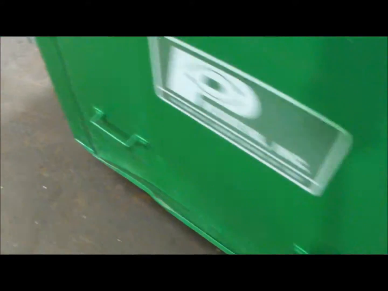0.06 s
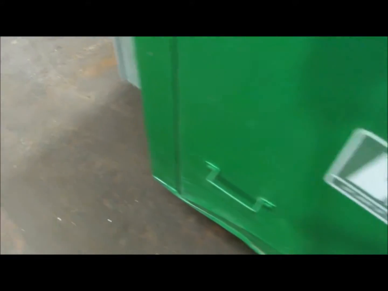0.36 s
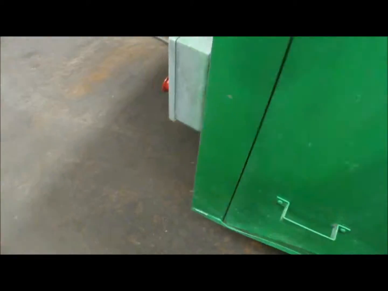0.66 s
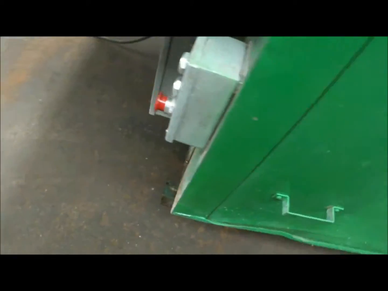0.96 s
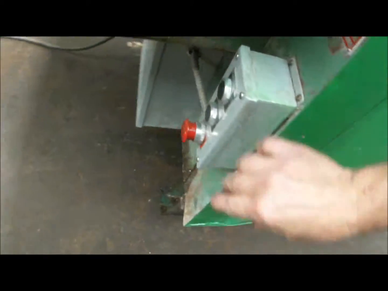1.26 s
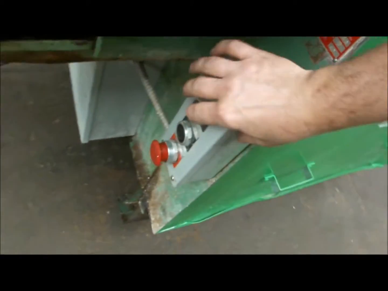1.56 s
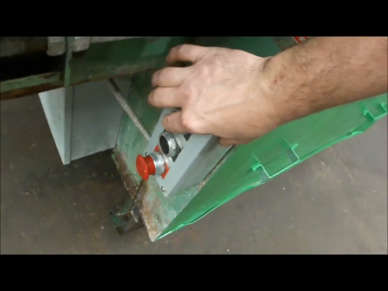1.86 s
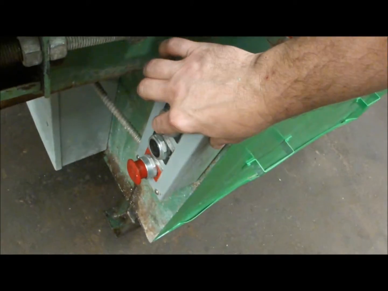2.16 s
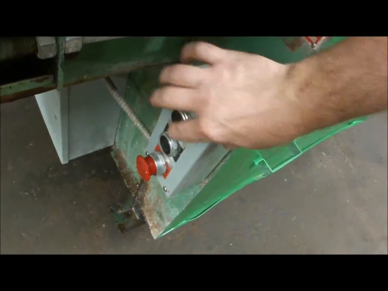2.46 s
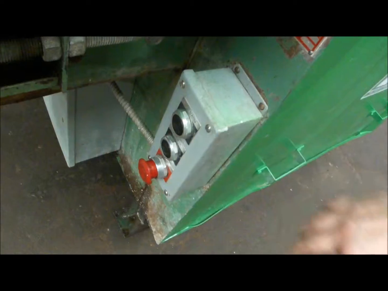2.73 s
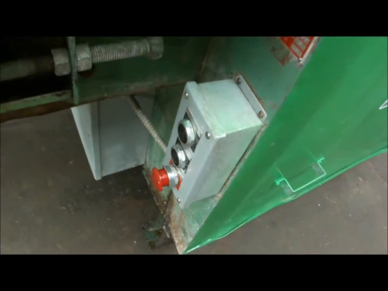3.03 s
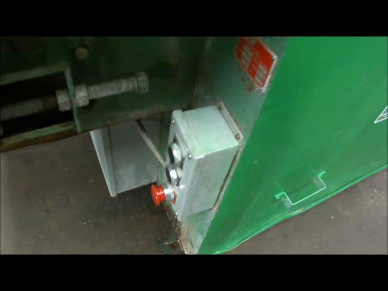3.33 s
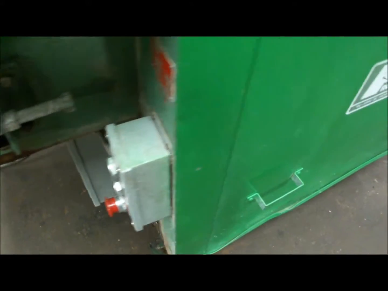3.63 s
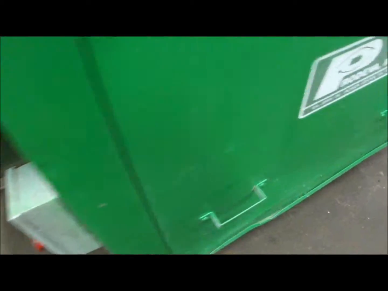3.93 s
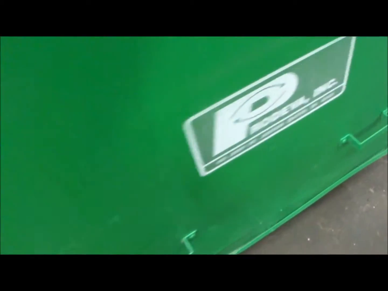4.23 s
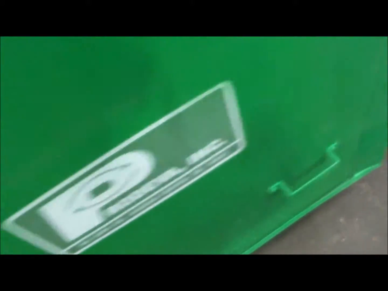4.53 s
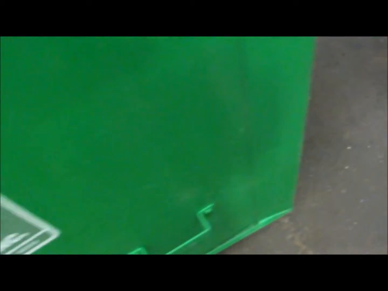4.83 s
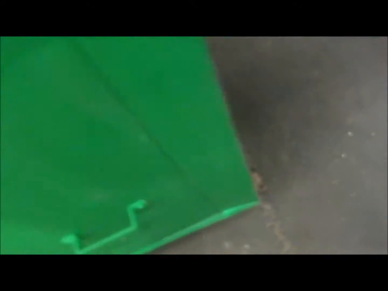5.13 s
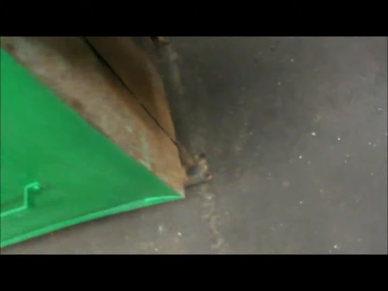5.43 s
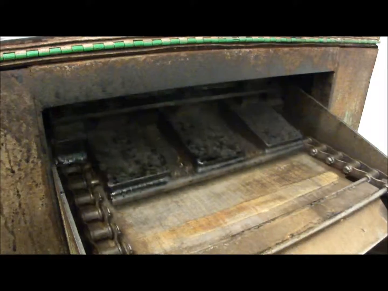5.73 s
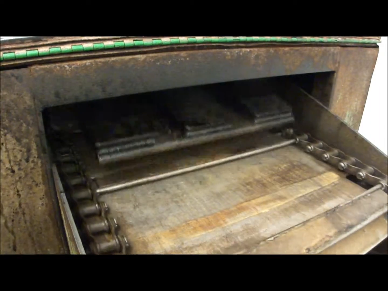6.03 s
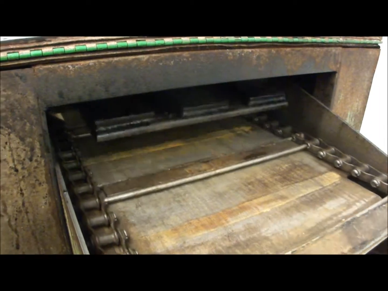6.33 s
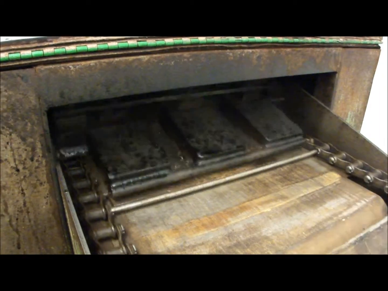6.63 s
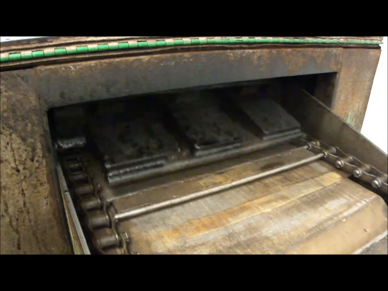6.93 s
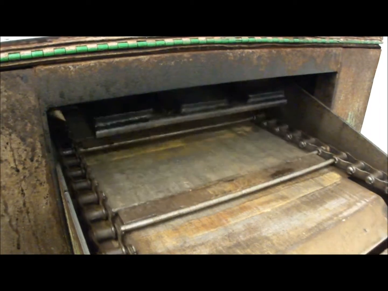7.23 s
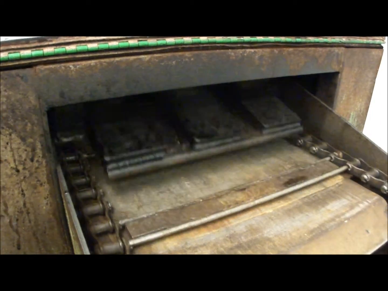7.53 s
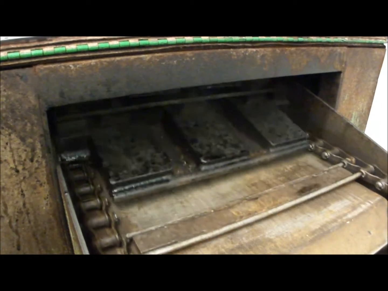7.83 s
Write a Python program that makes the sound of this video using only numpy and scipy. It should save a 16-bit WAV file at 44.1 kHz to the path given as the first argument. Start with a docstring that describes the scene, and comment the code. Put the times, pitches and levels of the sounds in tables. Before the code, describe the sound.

In a workshop, a machine's rumble dies away, leaving soft ventilation and hum. A hand knocks lightly on a control box, then a heavy switch clacks and the crusher starts again. Its steel casing rumbles and groans while a feed chain scrapes and rattles with brief thin squeals. Dull thumps and bright, ringing clanks of a press plate break in, loudest in the second half, all heard from close beside the machine.

```python
"""A machine rumbles to rest, a hand knocks on its control box, and it snaps on again to rattle and clank.
It is a chain-fed crusher in a workshop, heard from beside its steel casing. Once the contactor (a heavy
electric switch) closes, the drive shakes the casing's panels and the feed chain scrapes along a steel bed.
The swinging press plate strikes steel on steel: each clank is a bright crack and a ringing clang.
Throughout, a ring time (t60) is the number of seconds a sound takes to fade by 60 dB."""
import sys
import numpy as np
from scipy import signal
from scipy.fft import rfft, irfft, next_fast_len
from scipy.io import wavfile
from scipy.ndimage import uniform_filter1d

SR = 44100
rng = np.random.default_rng(int(sys.argv[2]) if len(sys.argv) > 2 else 0)


def unload_wav(signal):
    """Save mono or channel-first audio to the path in sys.argv[1] as 16-bit WAV at rate SR, clipped to [-1, 1]."""
    wavfile.write(
        sys.argv[1],
        SR,
        np.round(np.clip(np.atleast_2d(signal).T, -1, 1) * 32767).astype(np.int16),
    )


N = 351918
TIME = np.arange(N) / SR
BLOW_TIME = np.arange(24000) / SR  # the seconds of one blow
START_S = 2.3  # the motor starts
CRACK_RISE_S = .0003  # a crack builds up almost at once

# The tone colour of thin hiss. Each row: frequency in Hz, relative level in dB.
HISS = [(2000, -20), (2900, 6.5), (3500, 0.5), (4500, -3), (5100, -1), (5700, 1.5), (7000, 1), (9500, -6),
        (11000, -16), (12000, -70), (13700, -46), (15000, -16), (16000, -41)]
# The press plate's modes, the notes it rings with. Each row: pitch in Hz, level in dB, ring time in seconds.
PLATE = [(593, 1, 0.45), (777, -6, 0.47), (878, -4.5, 0.68), (940, -6, 0.32), (1040, -23, 0.4),
         (1151, -7, 0.46), (1247, -9.5, 0.35), (1280, -14.5, 0.58), (1708, -16, 0.18), (1800, -20, 0.33),
         (2130, -6.5, 0.31)]
# How near things sound as the listener goes from the control box along the side to the feed opening.
# Each row: time in seconds, casing gain in dB, chain gain in dB.
PLACE = [(2.3, 0, 0), (3., 0, -0.5), (4.5, 2.5, 2), (5.15, -2, 0.), (5.65, -5, 2), (6.6, -6, 1),
         (7.97, -4, 1.6)]


def amp(db):
    """Turns decibels into a gain."""
    return 10 ** (np.asarray(db) / 20)


def unit(x):
    """Scales a signal to an average (rms) level of 1."""
    return x / np.sqrt(np.mean(x ** 2) + 1e-20)


def level_at(spectrum, hz):
    """Looks up a spectrum's dB at any frequency, sliding between its rows."""
    row_hz, row_db = np.transpose(spectrum)
    return np.interp(np.log(hz + 1), np.log(row_hz + 1), row_db)


def gains(rows):
    """One gain curve over time for each dB column of a table."""
    times, *columns = np.transpose(rows)
    return [amp(np.interp(TIME, times, db)) for db in columns]


def add(mix, start_s, sound):
    """Adds a sound to the stereo mix; a mono sound goes to both ears."""
    part = mix[:, round(start_s * SR):][:, :sound.shape[-1]]
    part += sound[..., :part.shape[1]]


def wander(per_s):
    """Smooth random motion with up to about per_s swings a second."""
    hz = np.fft.rfftfreq(N, 1 / SR)
    return unit(irfft(rfft(rng.standard_normal(N)) / (1 + (hz / per_s) ** 4), N))


def decay(t, t60, rise):
    """A quick build-up and a fading tail."""
    return (1 - np.exp(-t / rise)) * np.exp(-np.log(1000) * t / t60)


def noise(shape, size=N):
    """Stereo noise with the gain shape(Hz): low notes mostly alike in both ears, treble wide."""
    # Stereo width. Each row: frequency in Hz, level of the side signal against the middle in dB.
    width = [(40, -3), (140, -27.5), (320, -21.5), (740, -19), (1700, -12), (2600, -11.5), (6000, -7),
             (10000, -2.5)]
    padded = next_fast_len(size, True)
    hz = np.fft.rfftfreq(padded, 1 / SR)
    mid, side = rng.standard_normal((2, len(hz))) + 1j * rng.standard_normal((2, len(hz)))
    side = side * amp(level_at(width, hz))
    return unit(irfft(np.array([mid + side, mid - side]) * shape(hz), padded)[:, :size])


def coloured(spectrum, size=N):
    """Noise with a given tone colour."""
    return noise(lambda hz: amp(level_at(spectrum, hz)), size)


def band(centre_hz, width_hz, size=N):
    """Noise in one bell-shaped band of frequencies."""
    return noise(lambda hz: np.exp(-((hz - centre_hz) / width_hz) ** 2), size)


def ringing(centre_hz, width_hz, size=N):
    """One resonance kept sounding by random shaking."""
    return noise(lambda hz: 1 / (1 + ((hz - centre_hz) / width_hz * 2) ** 2), size)


def favour(hz, spot_hz, boost_db=7.5, octaves=0.96):
    """Where a plate is struck decides which modes ring most: here, those near spot_hz."""
    closeness = np.exp(-(np.log2((hz + 1) / spot_hz) / octaves) ** 2)
    return amp(boost_db * (closeness - .5))


def steel(spectrum, ripple_db, size=N, spacing_hz=28.22, spot_hz=None):
    """Noise with ridges in its spectrum, from the random, closely spaced modes of steel plates."""
    ridge_hz = np.arange(2000) * spacing_hz
    ridges = amp(ripple_db * np.clip(rng.standard_normal(len(ridge_hz)), -2, 2))
    if spot_hz:
        ridges = ridges * favour(ridge_hz, spot_hz)
    return noise(lambda hz: amp(level_at(spectrum, hz)) * np.interp(hz, ridge_hz, ridges), size)


def ring_modes(table):
    """One tap sets a table of modes ringing, each starting up or down at random."""
    t = BLOW_TIME
    return sum(rng.choice([-1, 1]) * amp(db) * np.sin(2 * np.pi * hz * t) * decay(t, t60, CRACK_RISE_S)
               for hz, db, t60 in table)


def workshop(hiss_db=-21.0):
    """Ventilation with its thin hiss, a mains hum and a faint, wavering whine."""
    # The moving air. Each row: frequency in Hz, relative level in dB.
    air_colour = [(18, -61), (30, -63), (90, -13.5), (109, -23), (148, -7.5), (316, -1), (404, -4),
                  (428, -2), (470, -4), (649, -3.5), (701, -6), (1610, -9.5), (2800, -25.5), (3640, -99),
                  (6160, -120)]
    # The air fades as the machine starts. Each row: time in seconds, level in dB.
    air_level = [(0.3, -42), (0.8, -42), (1.4, -40.5), (1.8, -39.5), (2.25, -39), (2.6, -78)]
    # Mains hum. Each row: pitch in Hz, level in dB.
    hum_tones = [(59.5, -80.5), (119, -60)]
    # The whine. Each row: pitch in Hz, width in Hz, level in dB.
    whine_tones = [(437, 3.8, -64), (1609, 2.3, -54.5), (1665, 24, -70)]
    air = coloured(air_colour) + amp(hiss_db) * coloured(HISS)
    air = air * gains(air_level)[0] * amp(.5 * wander(25))
    hum = sum(amp(db) * unit(np.sin(2 * np.pi * hz * TIME)) for hz, db in hum_tones)
    hum = hum * amp(1.4 * wander(2.4))
    whine = sum(amp(db) * ringing(hz, width) for hz, width, db in whine_tones)
    return air + hum + whine


def brushes_and_ticks(tick_hz=4194.0):
    """Soft brushes of a hand and sleeve on the way to the control box, and later two dry ticks."""
    # Each row: start in seconds, level in dB, fade time (t60) in seconds.
    brushes = [(0.406, -48.5, 0.13), (0.467, -53, 0.066), (0.682, -52, 0.045), (1.04, -55, 0.083)]
    # Each row: start in seconds, strength in dB.
    ticks = [(4.331, -27), (5.5987, -12)]
    out, t = np.zeros((2, N)), np.arange(8000) / SR
    for start, db, t60 in brushes:
        add(out, start, amp(db) * coloured(HISS, len(t)) * decay(t, t60, rise=.001))
    for start, db in ticks:
        add(out, start, amp(db) * np.sin(2 * np.pi * tick_hz * t) * np.exp(-t / 0.00009))
    return out


def load_db():
    """The load on the drive: it drops quickly after a stroke, builds slowly, and surges as the chain bites."""
    # Each row: time of least load in seconds, depth in dB.
    slacks = [(2.56, 2.5), (3.68, 7.5), (4.149, 2.5), (4.68, 3), (6.2, 3), (7.16, 3.5)]
    # Each row: time in seconds, height in dB (below zero is a dip).
    surges = [(2.98, 2.5), (3.52, -2), (3.98, 0), (4.35, -0.5), (4.9, 1), (5.15, 3), (5.52, -2), (6.62, 0),
              (7.36, 2), (7.7, -1)]

    def bumps(rows, before_s, after_s):
        return sum(db * np.exp(-((TIME - s) / np.where(TIME < s, before_s, after_s)) ** 2)
                   for s, db in rows)

    return bumps(surges, before_s=0.09, after_s=0.12) - bumps(slacks, before_s=0.16, after_s=0.23)


def spin_up(rise_s=0.045):
    """The motor's sound fades in once the contactor closes."""
    return np.clip((TIME - START_S) / rise_s, 0, 1)


def panel_tone(hz, waver_hz=1.2, per_s=7.5):
    """A panel ringing freely: one slightly wavering tone."""
    return unit(np.sin(2 * np.pi * np.cumsum(hz + waver_hz * wander(per_s)) / SR))


def casing(panel_damping=1.6, load_share=1.15, coast_db=-25, fall_db_per_s=38.5, hiss_db=-31.5):
    """Large panels drum whenever the works move, and ring on as the machine coasts to rest."""
    # Two drumming panels. Each row: running pitch in Hz, width in Hz, running level in dB,
    # coasting pitch in Hz, coasting level in dB, how strongly nearness counts.
    panels = [(175.9, 25, -34.5, 160, -48, 1.42), (337.2, 12, -44.5, 350, -26.5, 0.14)]
    # Jolts that ring a panel or the press plate. Each row: start in seconds, level in dB, pitch in Hz, ring
    # time in seconds.
    jolts = [(2.39, -27, 595, 0.51), (2.41, -23.5, 333, 1.16), (2.67, -22.5, 335, .9),
             (3.29, -34, 590, 0.4), (3.37, -24.5, 380, 0.97), (3.47, -22, 334, 0.85),
             (4.83, -20, 180, 0.44), (5.28, -19, 485, 0.43), (5.39, -23, 490, 0.35),
             (5.5, -21.5, 380, 0.43), (5.765, -23, 1170, .25), (5.895, -21, 1160, 0.22),
             (6.04, -27, 578, 0.71), (6.53, -23.5, 338, 0.56), (6.875, -23, 1153, .3),
             (6.91, -18.5, 968, 0.38), (7.409, -25, 385, .5), (7.8, -27, 334, 0.82)]
    # The low boom close to the casing's side. Each row: time in seconds, level in dB.
    boom_level = [(2.28, -88), (2.4, -64), (3.6, -68), (4, -53.5), (5.1, -51), (5.7, -74), (6.7, -67),
                  (7.97, -77)]
    # The rumble of coming to rest. Each row: frequency in Hz, relative level in dB.
    coast_colour = [(29, -70), (50, -55), (133, -25), (173, 1), (290, -1.5), (349, 1.5), (394, -2),
                    (493, -3.5), (931, -13), (1920, -23), (3050, -40), (3960, -72), (6710, -120)]
    near, _ = gains(PLACE)
    driven = spin_up() * amp(load_share * load_db())
    dying = amp(-fall_db_per_s * TIME)
    drum, t = np.zeros((2, N)), TIME[:SR]
    for hz, width, db, free_hz, free_db, share in panels:
        drum += amp(db) * driven * near ** share * ringing(hz, width)
        drum += amp(free_db) * dying ** panel_damping * panel_tone(free_hz)
    for start, db, hz, t60 in jolts:
        add(drum, start, amp(db) * unit(np.sin(2 * np.pi * hz * t)) * decay(t, t60, rise=0.015))
    boom = gains(boom_level)[0] * band(centre_hz=94.4, width_hz=5.9)
    coast = coloured(coast_colour) + amp(hiss_db) * coloured(HISS)
    coast = coast * amp(coast_db) * dying * amp(0.77 * wander(35))
    return drum + boom + coast


def groan(db=-41.5, hz=510.0, width_hz=59.0, load_share=4.8):
    """The casing groans as the load peaks."""
    near, _ = gains(PLACE)
    return amp(db + load_share * load_db()) * np.sqrt(near) * ringing(hz, width_hz) * spin_up()


def rattle(spectrum, per_s, t60, spread_db, spots=10):
    """Many small knocks of uneven size, at several spots that each ring differently."""
    out, t = np.zeros((2, N)), np.arange(4096) / SR
    for _ in range(spots):
        hits = rng.random(N) < per_s / spots / SR
        knocks = hits * amp(spread_db * np.minimum(rng.exponential(1, N), 3))
        ring = coloured(spectrum, len(t)) * decay(t, t60, rise=0.0018)
        out += signal.oaconvolve(knocks[None], ring, axes=1)[:, :N]
    return unit(out)


def shifting_steel(spectrum, ripple_db, patterns=7):
    """As the listener moves along the casing, other modes of the bed come to the fore: one ridged pattern fades
    into the next."""
    travel = np.clip((TIME - START_S) / (TIME[-1] - START_S), 0, 1) * (patterns - 1)
    return sum(np.cos(np.pi / 2 * np.clip(travel - k, -1, 1)) * steel(spectrum, ripple_db)
               for k in range(patterns))


def drive_and_chain(split_hz=620, rumble_db=-26.5, scrape_db=-30.0, hiss_db=-53.0):
    """The drive shakes the casing while chain links scrape and knock along the steel bed."""
    # The running machine's tone colour. Each row: frequency in Hz, relative level in dB.
    running = [(18, -80), (30, -58), (53, -110), (76, -30.5), (129, -11.5), (166, -10.5), (208, -1.5),
               (341, 2), (470, -1.5), (591, -2), (1340, -13), (1500, -16.5), (1990, -16), (2600, -27.5),
               (2800, -47), (3640, -30), (6160, -120)]
    # Below split_hz it is the drive's rumble, above it the bed's scrape.
    bass = noise(lambda hz: amp(level_at(running, hz)) / np.sqrt(1 + (hz / split_hz) ** 6))
    bed = [(hz, db - 10 * np.log10(1 + (split_hz / hz) ** 6)) for hz, db in running if hz < 3000]
    bed.append((3400, -90))
    load, (near, chain) = load_db(), gains(PLACE)
    judder = wander(31)  # the load catches and slips
    sliding = amp(-.5 + 0.38 * judder) * shifting_steel(bed, ripple_db=4.0)
    rasp = band(centre_hz=2380, width_hz=330) * amp(-20.5 + 3.2 * wander(8.3))  # dry steel on steel
    links = amp(-10.5) * rattle(bed, per_s=90, t60=0.095, spread_db=5.5)
    # The chain shakes the press plate, which the casing's side shields.
    plate = noise(lambda f: sum(amp(db) / (1 + ((f - hz) * t60 / 5) ** 2) for hz, db, t60 in PLATE))
    plate = amp(-14.5) * plate / near ** 0.68
    fizz = amp(1.0 + 0.34 * judder) * steel(HISS, ripple_db=5.0)
    ticking = amp(2.0) * rattle(HISS, per_s=76, t60=0.18, spread_db=2.5)
    # Each layer follows the load and the listener's place by its own share.
    rumble = amp(rumble_db + 0.94 * load + 0.36 * judder) * near ** 0.14 * bass
    scrape = amp(scrape_db + 0.66 * load) * chain * (sliding + rasp + links + plate)
    hiss = amp(hiss_db + 0.51 * load) * near ** 0.32 * (fizz + ticking)
    return (rumble + scrape + hiss) * spin_up()


def squeals():
    """Dry metal joints sing briefly: narrow tones that swell, slide and fade."""
    # Each row: start and length in seconds, then pitch, glide and width in Hz, then level in dB.
    joints = [(0.698, .25, 4620, 28, 400, -74), (2.594, 0.28, 2675, 13, 55, -45),
              (2.864, 0.75, 2060, -17, 60, -47), (2.935, 0.065, 5570, -170, 110, -55),
              (3.992, 0.35, 2046, 13, 40, -43), (4.902, 0.36, 5400, 258, 420, -56),
              (5.598, 0.16, 5530, 120, 340, -53), (6.396, 0.41, 5400, 237, 220, -60),
              (7.476, 0.37, 1940, 7, 18, -41.5), (7.397, 0.35, 5640, 110, 220, -57.5),
              (7.696, 0.33, 5420, -93, 220, -59)]
    out = np.zeros((2, N))
    for start, length, hz, glide_hz, width_hz, db in joints:
        size = int(length * SR)
        slide = np.exp(2j * np.pi * np.cumsum(glide_hz * np.linspace(-.5, .5, size)) / SR)
        swing = signal.hilbert(ringing(hz, width_hz, size=SR))[:, :size]
        swing = swing / np.sqrt(abs(swing) + 1e-9)  # friction evens out the swing
        add(out, start, amp(db) * unit((swing * slide).real) * signal.windows.tukey(size, .4))
    return out


def contactor():
    """The switch closes and its box rings with a hollow knock."""
    # The box's modes. Each row: pitch in Hz, level in dB, ring time in seconds.
    box = [(582, -7, 0.2), (722, -1.5, .15), (799, -10, .22), (875, -1.5, 0.12), (1034, -14, .15)]
    # Each row: start in seconds, strength in dB.
    knocks = [(2.2845, -14), (2.36, -23), (2.392, -22)]
    out = np.zeros((2, N))
    for start, db in knocks:
        add(out, start, amp(db) * ring_modes(box))
    return out


def snap(db, hz=2650.0, width_hz=1500.0, t60=0.009):
    """The hard, very short snap of two edges meeting."""
    return amp(db) * band(hz, width_hz, len(BLOW_TIME)) * decay(BLOW_TIME, t60, CRACK_RISE_S)


def lip_chatter(per_s=110., rebound_db=-7.5, die_t60=0.41, snap_db=-6.0, rebounds=40):
    """The press plate's thin lip rings at a hard hit, then rebounds unevenly, ever weaker."""
    # The lip's modes. Each row: pitch in Hz, level in dB, ring time in seconds.
    lip = [(1500, -9, 0.056), (1715, -4.5, 0.15), (1942, -6.5, 0.13), (2115, -11, 0.13), (3420, -18.5, .07)]
    # Each row: start in seconds, strength in dB.
    lip_hits = [(3.2435, -19), (5.761, -24), (6.7232, -17), (6.872, -24), (7.809, -36)]
    out = np.zeros((2, N))
    for start, db in lip_hits:
        delays = np.r_[0, np.cumsum(rng.uniform(.3, 1.7, rebounds)) / per_s]
        for delay in delays[delays < die_t60 / 2]:
            strength = amp(db + rebound_db * (delay > 0) - 60 * delay / die_t60)
            add(out, start + delay, strength * (ring_modes(lip) + snap(snap_db)))
    return out


def crack(db, t60, room_db=-18.0, room_t60=0.45):
    """The bright crack at the point of contact, with its echo in the workshop."""
    # The crack's tone colour. Each row: frequency in Hz, relative level in dB.
    crack_colour = [(800, -50), (1800, -28), (2700, -46), (3500, -3), (4500, -2), (5100, -0.5), (6000, 9.5),
                    (7500, 5.5), (10000, -2.5), (12500, -27), (15500, -17)]
    contact = steel(crack_colour, ripple_db=3., size=len(BLOW_TIME), spacing_hz=110.)
    echo = amp(room_db) * decay(BLOW_TIME, room_t60, rise=0.0046)
    return amp(db) * contact * (decay(BLOW_TIME, t60, CRACK_RISE_S) + echo)


def clang(db, spot_hz, t60, free_t60=.5, detune=0.045):
    """A blow spreads into the steel's dense modes and the plate's few strong ones."""
    # The dense modes' tone colour. Each row: frequency in Hz, relative level in dB.
    clang_colour = [(47, -56), (80, -31), (164, -27), (240, -33), (378, 7.5), (408, -5), (521, 0),
                    (589, 1.5), (823, -1), (888, -2.5), (1080, -1.5), (2180, -8.5), (3050, -25.5),
                    (3960, -30), (6710, -120)]
    t = BLOW_TIME
    free = min(t60 / free_t60, 1)  # a plate still in contact rings weakly, briefly and a little off pitch
    mode_hz, mode_db, mode_t60 = np.transpose(PLATE)
    ring_hz = mode_hz * (1 + detune * (1 - free) * rng.uniform(-1, 1, len(PLATE)))
    rings = np.array([np.sin(2 * np.pi * hz * t) * decay(t, ring_t60 * np.sqrt(free), rise=0.011)
                      for hz, ring_t60 in zip(ring_hz, mode_t60)])
    dense = steel(clang_colour, ripple_db=5.0, size=len(t), spot_hz=spot_hz) * decay(t, t60, rise=0.00044)
    strengths = amp(mode_db) * favour(mode_hz, spot_hz, boost_db=18., octaves=.13)
    signs = rng.choice([-1, 1], len(PLATE))
    return amp(db) * (dense + free * ((strengths * signs) @ rings))


def impacts(low_cut_hz=110.0, thump_peak_hz=380):
    """Steel on steel: two-stage strikes, uneven bounces, catching links and dull thumps."""
    # The contactor and press plate touch, then seat fully. Each row: start in seconds; clang, crack and
    # snap in dB; pitch in Hz; crack ring time in seconds; then for the seating: delay in seconds,
    # clang and crack in dB, pitch in Hz, clang ring time in seconds.
    strikes = [(2.2798, -21.5, -23.5, -54, 790, 0.058, 0.0057, -21.5, -41, 780, 0.11),
               (3.2425, -15.5, -33, -23, 1540, .075, .0205, -22, -44, 565, 0.32),
               (5.7392, -16.5, -20.5, -29, 1140, 0.018, .03, -14.5, -28.5, 1290, 0.19),
               (6.7229, -13.5, -16.5, -24, 1180, 0.0088, .005, -19, -32, 880, 0.68),
               (6.8726, -15, -37, -22.5, 1170, 0.023, .0125, -23, -42, 1300, 0.35)]
    # The hand on the box, and the plate falling back.
    # Each row: start in seconds, clang and crack in dB, pitch in Hz, crack ring time in seconds.
    knocks = [(1.558, -31, -48.5, 1100, .19), (1.578, -35, -48, 684, .19), (1.591, -42, -49.5, 1100, .19),
              (1.608, -40.5, -50, 1070, .12), (2.3494, -18, -28.5, 714, 0.059),
              (2.359, -19, -49, 804, 0.086), (2.381, -20.5, -35, 694, 0.16), (2.392, -17.5, -45, 730, .12),
              (3.283, -21, -49, 745, 0.12), (3.302, -37, -52, 1090, .1), (3.321, -42, -55, 1700, 0.093),
              (3.373, -16.5, -48, 1230, .1), (3.3852, -25.5, -33, 1420, 0.083),
              (3.4155, -23, -34, 1010, 0.08), (3.436, -27, -52, 970, .1), (3.456, -23, -46, 1030, .1),
              (3.463, -32, -39.5, 1080, 0.14), (3.509, -26.5, -39, 1010, 0.079),
              (5.8769, -13, -35.5, 1010, 0.33), (5.903, -20.5, -45, 1130, 0.16),
              (5.92, -25, -49, 1120, .15), (5.96, -27, -44, 1050, 0.12), (6.86, -21, -54, 840, .1),
              (6.91, -17.5, -37.5, 950, 0.12), (6.944, -25, -45, 890, 0.15),
              (6.989, -20.5, -41.5, 1040, 0.19)]
    # Links catching on the bed. Each row: start in seconds, clang and crack in dB.
    clinks = [(2.926, -30, -61), (3.851, -37, -43), (3.9269, -26.5, -43.5), (3.975, -31.5, -44),
              (4.224, -26.5, -60), (4.456, -37, -42), (4.5667, -29.5, -42), (5.271, -19.5, -52),
              (5.4115, -23.5, -38), (5.51, -32, -44), (6.657, -21.5, -45), (7.2627, -24.5, -40),
              (7.424, -29.5, -48)]
    # The chain's bars dropping onto the bed. Each row: start in seconds, level in dB, pitch in Hz.
    clunks = [(4.328, -23.5, 700), (5.083, -19, 690), (5.371, -15, 800), (7.262, -24, 800),
              (7.637, -16.5, 750)]
    # Thumps inside the casing. Each row: start in seconds, thump and wall clang in dB, pitch in Hz.
    thumps = [(2.299, -22.5, -31, 342), (2.391, -17.5, -30, 368), (4.318, -19, -32, 383),
              (4.384, -25.5, -43, 380), (5.081, -17, -27, 377), (5.227, -22, -21, 480),
              (5.292, -20, -42, 490), (5.372, -23.5, -26, 463), (5.432, -21, -38, 410),
              (6.552, -25, -25.5, 386), (6.951, -23, -30, 384), (7.637, -21.5, -29, 350),
              (7.81, -23, -19, 385)]
    # A thump's tone colour, slid to each pitch. Each row: frequency in Hz, relative level in dB.
    thump_colour = [(60, -46), (160, -3), (380, 19), (650, -3.5), (1000, -1), (2500, -65), (4000, -85)]
    out = np.zeros((2, N))
    for start, clang_db, crack_db, snap_db, hz, crack_t60, *seating in strikes:
        add(out, start, clang(clang_db, hz, t60=0.27) + crack(crack_db, crack_t60) + snap(snap_db))
        delay, clang_db, crack_db, hz, t60 = seating
        add(out, start + delay, clang(clang_db, hz, t60) + crack(crack_db, t60=0.098))
    for start, clang_db, crack_db, hz, crack_t60 in knocks:
        add(out, start, clang(clang_db, hz, t60=0.36) + crack(crack_db, crack_t60) + snap(crack_db + 4.5))
    for start, clang_db, crack_db in clinks:
        add(out, start, clang(clang_db, spot_hz=1330, t60=0.22) + crack(crack_db, t60=0.083))
    for start, db, hz in clunks:
        add(out, start, clang(db, hz, t60=0.052))
    for start, db, wall_db, hz in thumps:
        body = noise(lambda f: amp(level_at(thump_colour, f * thump_peak_hz / hz)), len(BLOW_TIME))
        thump = amp(db) * body * decay(BLOW_TIME, t60=0.3, rise=0.00098)
        add(out, start, thump + clang(wall_db, spot_hz=690, t60=0.4))
    return signal.sosfilt(signal.butter(3, low_cut_hz, "high", fs=SR, output="sos"), out)


def scene():
    """Everything together, the left a little louder."""
    mix = workshop() + casing() + groan() + drive_and_chain() + squeals()
    mix = mix + impacts() + contactor() + lip_chatter() + brushes_and_ticks()
    return mix * amp([[.42], [-.42]])


def running_db(x, samples):
    """The level of a stereo sound in dB, averaged over a short sliding window."""
    return 10 * np.log10(abs(uniform_filter1d((x ** 2).mean(0), size=samples)) + 1e-12)


def suppressor(x, width_hz=226.0, steepness=2.23, open_db=-42.5, knee_db=6.):
    """Cuts three sharp notches in the sound, and lets those pitches back in when the treble is loud."""
    # Each entry: the centre of a notch in Hz.
    notches_hz = [3005, 4010, 5000]
    hz = np.fft.rfftfreq(N, 1 / SR)
    notch = np.prod([abs(hz - centre) / np.hypot(hz - centre, width_hz) for centre in notches_hz], axis=0)
    notched = irfft(rfft(x) * notch ** steepness, N)
    treble = irfft(rfft(x) * (hz > notches_hz[0]), N)
    opened = .5 + .5 * np.tanh((running_db(treble, samples=900) - open_db) / knee_db)
    return notched + opened * (x - notched)


def record(dry, threshold_db=-18.0, share=0.66, recover_db_per_s=31.0, ceiling=.46, top_hz=15830):
    """Turns down loud clanks, rounds the peaks, applies the suppressor and cuts the highest treble."""
    fall = TIME * recover_db_per_s
    held_db = np.maximum.accumulate(running_db(dry, samples=400) + fall) - fall  # jumps up, sinks slowly
    over_db = np.maximum(held_db - threshold_db, 0)
    levelled = dry / amp(share * uniform_filter1d(over_db, size=100))
    rounded = levelled / (1 + (levelled / ceiling) ** 8) ** (1 / 8)
    treble_cut = signal.firwin(511, top_hz, window=("kaiser", 9), fs=SR)
    return signal.oaconvolve(suppressor(rounded), treble_cut[None], "same")


dry = scene()
out = record(dry)
unload_wav(out)
```